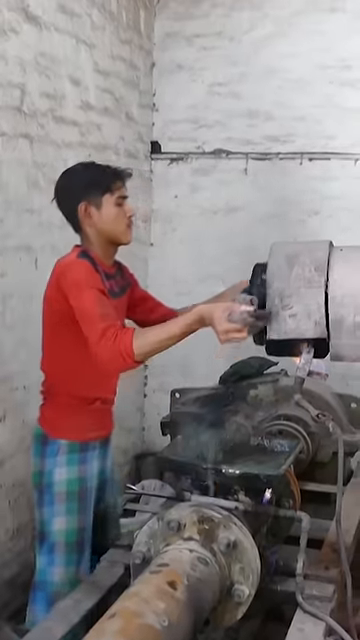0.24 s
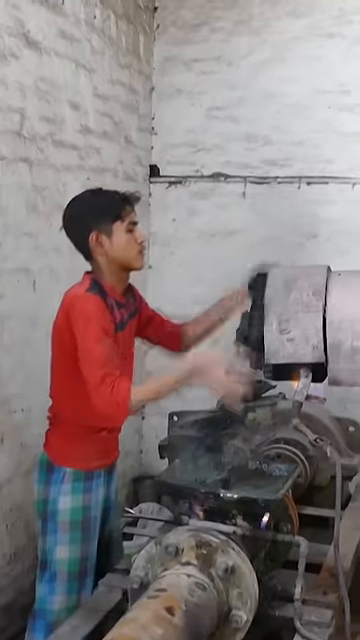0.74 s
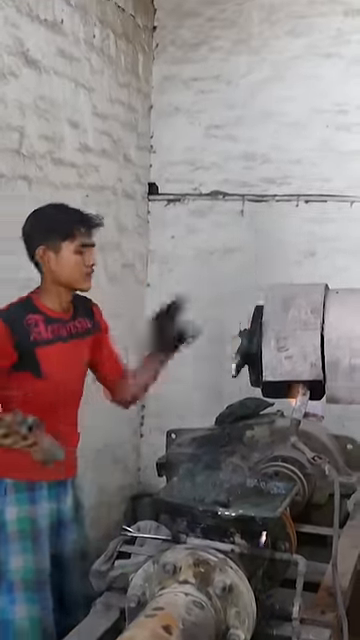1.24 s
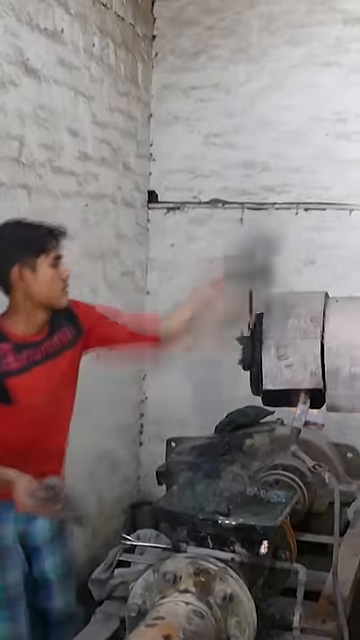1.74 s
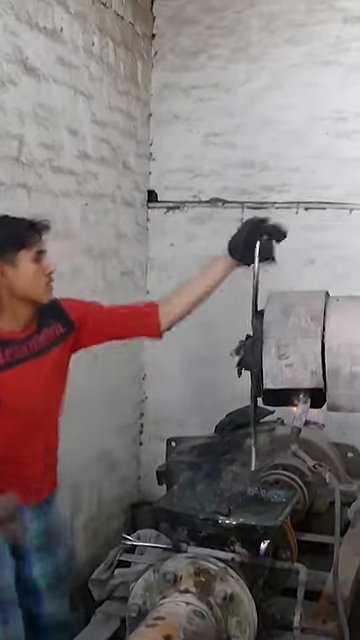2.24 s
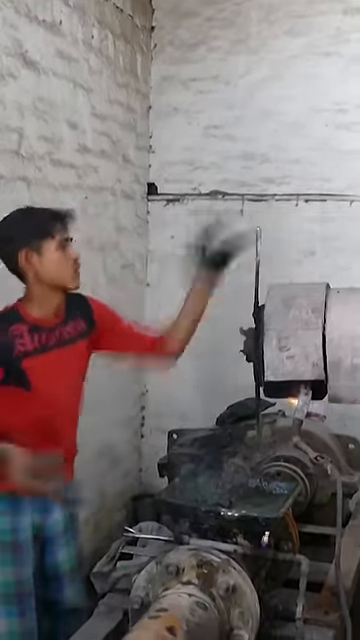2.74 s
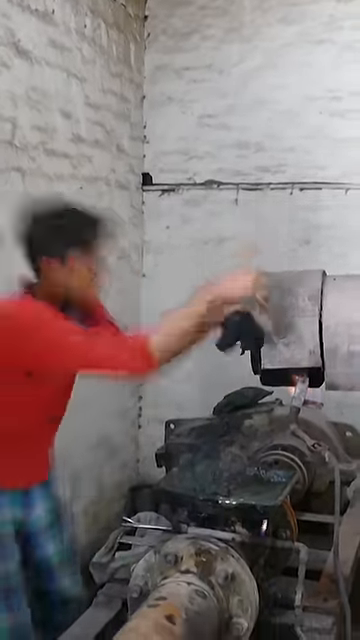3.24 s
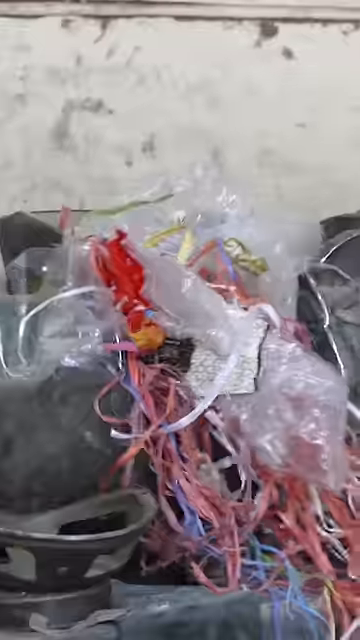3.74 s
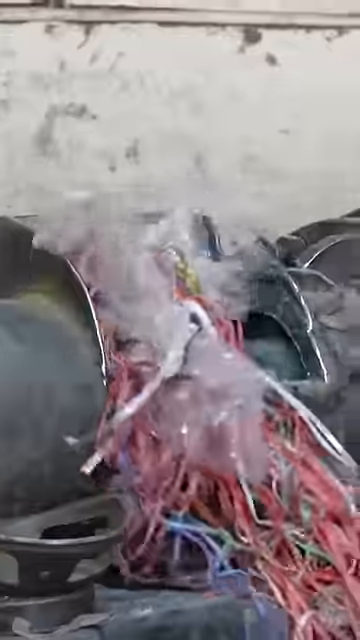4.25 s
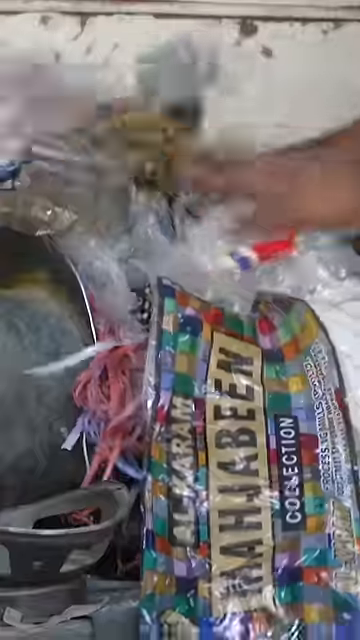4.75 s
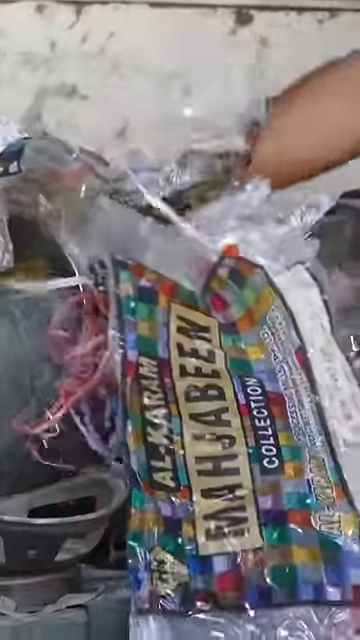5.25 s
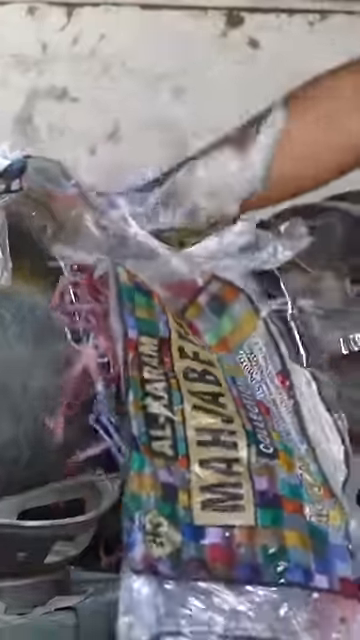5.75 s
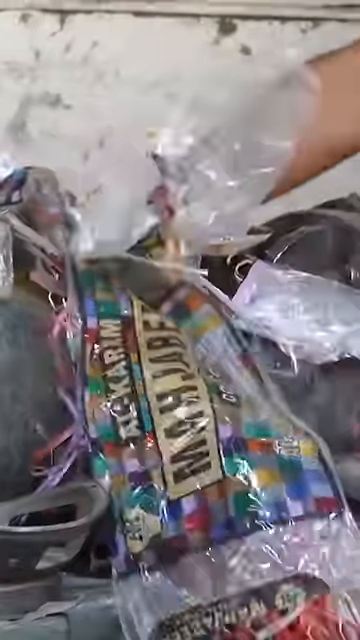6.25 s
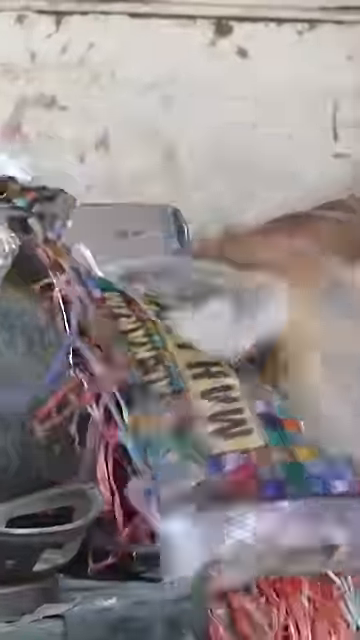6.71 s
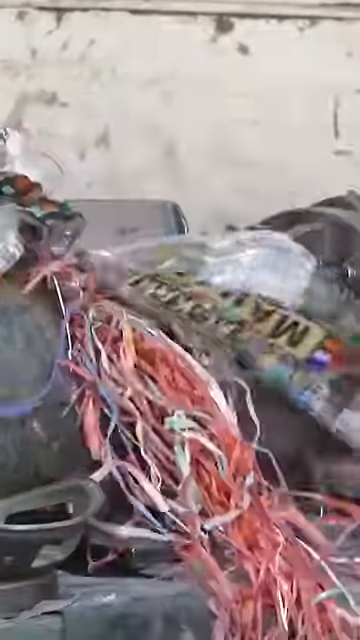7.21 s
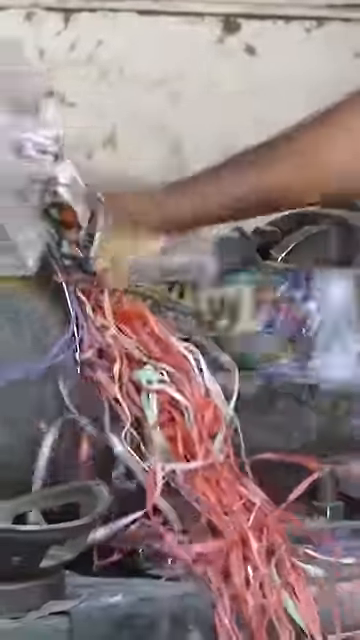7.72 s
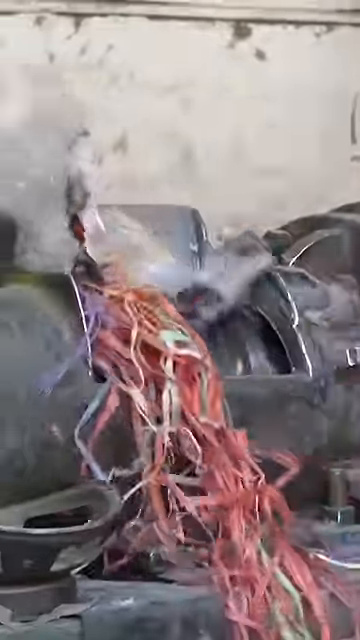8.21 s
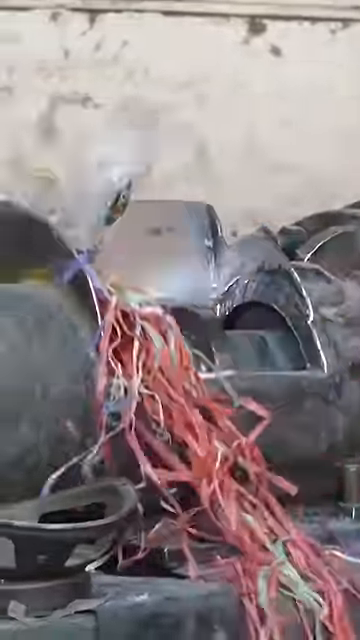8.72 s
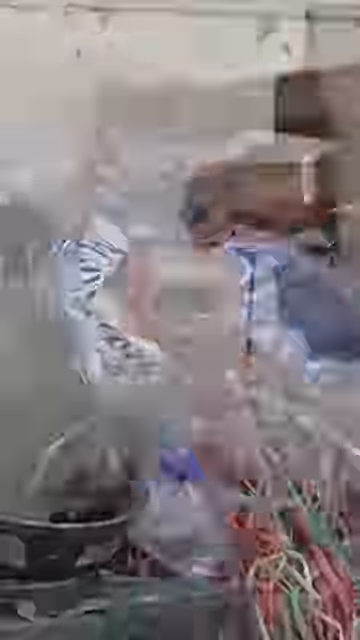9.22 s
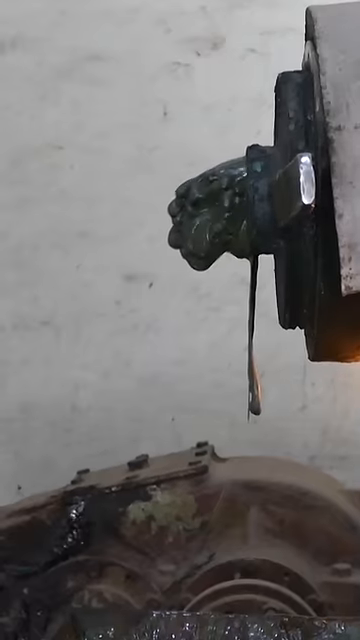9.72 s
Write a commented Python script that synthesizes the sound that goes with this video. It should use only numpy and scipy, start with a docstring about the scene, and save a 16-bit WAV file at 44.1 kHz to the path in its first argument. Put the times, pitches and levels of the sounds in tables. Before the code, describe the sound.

A plastic extruder runs close by in a small workshop, its gears whining steadily over a churning hiss. A quick double clack rings on iron at the start, followed by several short, high spits of steam and a sharp snap. The sound shifts abruptly to a wavering, pulsing drone with a faint sheet metal rattle and occasional crunches of plastic. Near the end the tone shifts again, with more crunches.

```python
"""A small brick workshop, one stereo microphone close to a plastic recycling extruder in three places
in turn: die head, feed hopper, nozzle. Gear teeth whine over the churn of bearings, fan and melt.
At the die a lump of plastic clacks on the iron head and the hot melt spits steam. At hopper and nozzle
a belt-driven rotor wavers and swells with each turn of the feed, scrap rings the hopper's sheet metal
and the screw crunches plastic."""
import sys
import numpy as np
from scipy.fft import rfft, irfft, next_fast_len
from scipy.io import wavfile
from scipy.ndimage import uniform_filter1d, map_coordinates

SR = 44100
rng = np.random.default_rng(int(sys.argv[2]) if len(sys.argv) > 2 else 0)


def unload_audio(sound):
    """Save the sound as a 16-bit wav file, at the path given as the first command line argument."""
    columns = np.transpose(np.atleast_2d(sound))
    # keep every value between -1 and 1, then stretch to whole-number steps
    steps = np.round(np.clip(columns, -1, 1) * 32767)
    wavfile.write(sys.argv[1], SR, steps.astype(np.int16))


N = 439677
T = np.arange(N) / SR
MOVES_S = [3.735, 9.292]  # the microphone goes to the hopper, then to the nozzle
MESH_HZ = [112.0, 111.92, 112.15]  # tooth rate at die, hopper, nozzle with an empty screw


# Main gear partials: mesh multiple, level/dB at die, hopper, nozzle, gain/dB when full, under strain
MAIN_PARTIALS = [(4, -31.5, -33.5, -34.5, 3, -0.5), (8, -20.5, -25, -30, -2, -1.5),
                 (12, -31.5, -31, -28.5, 1, 4)]
# Weaker gear partials: mesh multiple, relative level/dB at die, hopper, nozzle
WEAK_PARTIALS = [(1, -68.5, -92, -88), (2, -58.5, -61, -64.5), (3, -45.5, -48, -64), (5, -45, -51, -36.5),
                 (6, -45, -63, -55), (7, -46, -63, -42), (9, -50, -44, -34), (10, -66, -46, -46),
                 (11, -57, -67, -53), (13, -48, -51, -48), (16, -44.5, -43, -37), (20, -43, -40, -36.5),
                 (23, -54, -85, -51), (24, -43, -47, -54), (27, -43.5, -56, -53), (28, -46, -85, -60)]

def gearbox():
    """Tooth contacts give a stack of partials; the 4th, 8th and 12th carry the whine."""
    mesh = phase_of(mesh_rate())
    fourth_db, eighth_db, twelfth_db = [by_place(levels) + full_db * fill() + strain_db * strain()
                                        for _, *levels, full_db, strain_db in MAIN_PARTIALS]
    fourth, eighth, twelfth = [row[0] * mesh + 2 * np.pi * rng.random() for row in MAIN_PARTIALS]
    swell_db = 2.5 * np.exp(-((T - 2.13) / .64) ** 2)  # once, at the die
    out = amp(fourth_db + swell_db + .5 * wobble(2.92) + .64 * wobble(17)) * np.sin(fourth)
    fade_db = -.3 * (T - MOVES_S[0] / 2) * by_place([1, 0, 0])
    out += amp(eighth_db + fade_db + .35 * wobble(3.15) + .46 * wobble(14)) * np.sin(eighth)
    # a motor tone just above the 12th beats with it, most deeply at the die
    neighbour = by_place([.6, .1, .05]) * np.sin(twelfth + cycle(hz=5.44, peak_s=.068))
    out += amp(twelfth_db + by_place([.7, 1.8, .8]) * wobble(12)) * (np.sin(twelfth) + neighbour)
    for multiple, *levels in WEAK_PARTIALS:
        level = amp(by_place(levels) - 1 + 2.14 * wobble(9))
        out += level * np.sin(multiple * mesh + .5 * wobble(7) + 2 * np.pi * rng.random())
    return np.sqrt(2) * out


# Rotor partials: multiple of the rotor tone, level/dB at hopper, nozzle, gain/dB with a full screw
ROTOR_PARTIALS = [(1, -30, -42, 0.5), (2, -31, -31.5, 0), (3, -37, -52, -2.5), (4, -30.5, -35.5, -4.5)]

def rotor():
    """The belt tugs the rotor's speed once a lap; its low partials swell with each turn of the feed."""
    full, lap = fill(), belt()
    feed = np.cos(cycle(hz=2.283, peak_s=7.17))  # load on the feed screw
    rotor_hz = 477.5 + 4 * full
    waver = .0057 * np.cos(lap - 1.3) + (.0027 + .0038 * full) * feed + .00195 * wobble(22)
    angle = phase_of(rotor_hz * (1 + waver))
    arch = np.sqrt(np.abs(1 + feed) / 2)  # broad tops, narrow dips
    flap_db = 2 * np.cos(lap - 1.7) + 2 * np.cos(2 * lap - 2.4)  # the belt flaps on both pulleys
    swells_db = [14 * (arch - .8),
                 (2.5 + 7.5 * full) * (arch - .7) + flap_db,
                 2.9 * np.cos(lap + 1),
                 9 * (np.cos(lap + .31) - 1)]  # the 4th partial chirps once a lap
    out = np.zeros(N)
    for (multiple, hopper_db, nozzle_db, full_db), swell_db in zip(ROTOR_PARTIALS, swells_db):
        rough_db = 2.04 * np.sqrt(multiple) * wobble(50)
        level = by_place([0, amp(hopper_db), amp(nozzle_db)]) * amp(full_db * full + swell_db + rough_db)
        out -= level * np.cos(multiple * (angle + .13 * wobble(55)))  # in step: one pulse a cycle
    return np.sqrt(2) * out


# Machine noise at each microphone place: f/Hz, relative level/dB
DIE_NOISE = [(30, -95), (170, -85), (290, -70.5), (560, -64), (900, -62), (1400, -61.5), (2000, -66.5),
             (3400, -62.5), (4450, -67), (5600, -84.5), (7300, -81.5), (8200, -76), (10400, -74.5),
             (12400, -84), (15800, -82)]
HOPPER_NOISE = [(30, -93), (170, -93), (300, -73.5), (430, -63.5), (590, -55.5), (980, -54.5), (1150, -59),
                (1500, -57), (2100, -62.5), (3200, -62.5), (4300, -71), (5400, -74), (7000, -71.5),
                (9500, -75.5), (11500, -81), (15800, -85)]
NOZZLE_NOISE = [(30, -90), (160, -91), (300, -73), (450, -57), (600, -56), (820, -57.5), (950, -51.5),
                (1050, -49.5), (1170, -62.5), (1500, -56), (1900, -63.5), (2400, -60.5), (3500, -65.5),
                (4400, -72), (9500, -76.5), (15800, -87.5)]
# Its stereo width there: f/Hz, side minus mid/dB
DIE_WIDTH = [(60, -10), (120, -10), (240, -13), (480, -25), (950, -21), (1900, -14.5), (3000, -18),
             (4400, -7), (6500, -12), (15000, -10)]
HOPPER_WIDTH = [(60, -11), (120, -10), (240, -8), (480, -37.5), (950, -48.5), (1900, -18), (3800, -13.5),
                (7500, -13.5), (11000, -15.5), (15000, -34)]
NOZZLE_WIDTH = [(60, -12), (240, -12), (480, -32), (950, -30), (1900, -17), (3800, -15), (10000, -12),
                (15000, -25)]

def churn():
    """Bearings, fan and melt make a wide noise that pulses with the teeth and follows the load."""
    places = (DIE_NOISE, DIE_WIDTH), (HOPPER_NOISE, HOPPER_WIDTH), (NOZZLE_NOISE, NOZZLE_WIDTH)
    noise = sum(by_place(here) * casing(rush(*place)) for here, place in zip(np.eye(3), places))
    body = filtered(noise, lambda hz: 1 / (1 + (hz / 2200) ** 6))
    hiss = unit(noise - body)
    teeth = np.cos(phase_of(mesh_rate()))
    shaft = np.cos(cycle(hz=26.6, peak_s=0))  # the pulley shaft rattles once a turn
    near_feed = by_place([0, 1, 1])
    body_db = -1 + 1.34 * wobble(25) + .27 * teeth + near_feed * (.5 * np.cos(belt()) + 1.5 * shaft)
    hiss_db = by_place([-28, -30.5, -29]) + 1.5 * strain()
    hiss_db += .59 * wobble(40) + .33 * wobble(6) + .1 * teeth + .24 * shaft
    hiss_db -= .56 * near_feed * np.cos(cycle(hz=2.34, peak_s=7.22))
    return body * amp(body_db) + hiss * amp(hiss_db)


def casing(x, ripple_db=2.4, spacing_hz=18):
    """Crowded resonances of the iron frame and the room ripple the spectrum."""
    knots = rng.standard_normal(4096)
    ripple = lambda hz: map_coordinates(knots, [hz / spacing_hz], order=1, mode="wrap")
    return filtered(x, lambda hz: amp(ripple_db * ripple(hz) / (1 + (hz / 6000) ** 2)))


# Knocks on the die head, close by: t/s, relative level/dB
KNOCKS = [(.286, -19), (.313, -19.5)]
# Modes of the iron head: f/Hz, relative level/dB, t60/s
IRON_MODES = [(656.6, -6, 0.45), (1140, -8, .12), (1720, -4, .12), (2050, -5, .15), (2568, -9, .12),
              (3120, -1, 0.14), (3630, 0, 0.079), (3770, -3, 0.17)]
# Cracking plastic: f/Hz, relative level/dB
PLASTIC_SPECTRUM = [(400, -22), (650, 7), (900, 3), (1500, 10), (3300, 6), (4500, -23), (10000, -30)]

def clacks():
    """A lump of plastic hits the head with a short crack and rings the iron, each time differently."""
    iron = np.zeros(N)
    age = T[:SR // 2]
    for s, db in KNOCKS:
        ring = np.zeros(len(age))
        for hz, mode_db, t60 in IRON_MODES:
            level = amp(mode_db + rng.normal(0, 2) - 60 * age / t60)
            ring += level * np.sin(2 * np.pi * (hz * age + rng.random()))
        iron[round(s * SR):][:len(age)] += amp(db - 5) * ring * (1 - np.exp(-age / .001))
    crack = bursts(KNOCKS, PLASTIC_SPECTRUM, rise_s=.001, t60=.04, tail_db=-21, tail_t60=.2)
    return iron + amp(-1) * crack


# Spits close to the die: t/s, level/dB
STEAM_SPITS = [(2.205, -42), (2.603, -24), (2.842, -32), (3.001, -25), (3.363, -28), (3.612, -34)]
# Their hiss: f/Hz, relative level/dB
STEAM_SPECTRUM = [(4000, -40), (6500, -14), (7500, -7), (8700, 5), (9300, -7), (12300, -14), (13200, -2),
                  (14000, -9), (14900, -4), (16000, -12)]

def steam():
    """The hot melt spits steam in short, high puffs."""
    return bursts(STEAM_SPITS, STEAM_SPECTRUM, rise_s=.0033, t60=.063, tail_db=-7.5, tail_t60=.41)


SNAP_S = 3.084
# The snap's colour: f/Hz, relative level/dB
SNAP_SPECTRUM = [(5000, -30), (8000, -4), (10300, 4), (12000, -8), (15500, -11)]

def snap():
    """One sharp, bright snap at the die."""
    envelope = np.exp(-((T - SNAP_S - .001) / .0011) ** 2)
    return amp(-19.5) * envelope * unit(rush(SNAP_SPECTRUM, BURST_WIDTH))


# Plastic in the screw, heard from hopper and nozzle: t/s, level/dB
SCREW_BITES = [(3.765, -22), (3.805, -26), (8.68, -26.5), (8.83, -22), (9.395, -24), (9.454, -30),
               (9.75, -25)]

def crunches():
    """Plastic caught by the screw breaks in crackling bursts."""
    crackle = amp(3.5 * wobble(120))
    return crackle * bursts(SCREW_BITES, PLASTIC_SPECTRUM, rise_s=.0074, t60=.15,
                            tail_db=-14, tail_t60=.19)


# Sheet metal modes: f/Hz, bandwidth/Hz, level/dB at the hopper
SHEET_MODES = [(590.5, 39, -37.5), (670.6, 25, -39.5), (780, 28, -43)]

def chute(knocks_per_s=90):
    """Scrap knocks at random on the hopper's sheet metal, which rings in a few low modes."""
    knocks = (rng.random(N) < knocks_per_s / SR) * rng.standard_normal(N)
    out = np.zeros(N)
    for hz, width, db in SHEET_MODES:
        resonance = lambda f: (1j * f * width / (hz * hz - f * f + 1j * f * width)) ** 2
        out += amp(db) * unit(filtered(knocks, resonance))
    return by_place([0, 1, .8]) * out


# Motor and bearing tones: f/Hz at the opening speed, level/dB at die, hopper, nozzle
MOTOR_TONES = [(549, -49, -50, -56), (1464, -43, -52, -43), (2304, -41, -52, -43), (3290, -52, -46, -55),
               (3402, -48, -51, -47), (3725, -47, -62, -52), (3838, -43, -44, -53), (4497, -54, -68, -66),
               (4834, -67, -56, -58)]

def motor():
    """Motor and bearings sing faintly behind the gears and follow their speed."""
    mesh_hz = mesh_rate()
    out = np.zeros(N)
    for hz, *levels in MOTOR_TONES:
        level = amp(by_place(levels) + 1.8 * wobble(9))
        out += level * np.sin(phase_of(hz * mesh_hz / mesh_hz[0]) + .5 * wobble(13))
    return np.sqrt(2) * out


# Wads jamming in the screw: t/s, length/s
JAMS = [(3.74, 0.31), (9.276, 0.073)]

def strain(rise_s=.037, release_s=.38):
    """Effort of the screw, 0-1: it rises fast on a wad, holds and lets go."""
    return sum(np.clip(1 + (T - s) / rise_s, 0, 1) * np.exp(-np.maximum(T - s - length, 0) / release_s)
               for s, length in JAMS)


def fill(start_s=4.3, length_s=3.3):
    """How full the screw is, 0-1, at the hopper only: it grows as scrap is fed in."""
    return np.clip((T - start_s) / length_s, 0, 1) * by_place([0, 1, 0])


def mesh_rate(sag_hz=.3):
    """Teeth per second: steady, sagging a little as the screw fills."""
    return by_place(MESH_HZ) - sag_hz * fill()


def belt():
    """Angle of the drive belt on its way round."""
    return cycle(hz=5.925, peak_s=6.5)


# Stereo width of short sounds at the microphone: f/Hz, side minus mid/dB
BURST_WIDTH = [(60, -11), (150, -14), (400, -26), (1000, -25), (2400, -16), (5000, -10), (14000, -13)]

def bursts(events, spectrum, rise_s, t60, tail_db, tail_t60):
    """Short puffs of noise, each with a weaker tail from the room."""
    level = np.zeros(N)
    for s, db in events:
        age = np.maximum(T - s, 0)
        decay = amp(-60 * age / t60) + amp(tail_db - 60 * age / tail_t60)
        level += amp(db) * (1 - np.exp(-age / rise_s)) * decay
    return level * unit(rush(spectrum, BURST_WIDTH))


def rush(spectrum, width):
    """Stereo noise with the given level per Hz and side share."""
    white = rng.standard_normal((2, N)) * np.sqrt(SR / 2)
    mid, side = filtered(white, lambda hz: gain_at(spectrum, hz) * [np.ones_like(hz), gain_at(width, hz)])
    return np.array([mid + side, mid - side])


def by_place(values):
    """The value for where the microphone stands: die, hopper, nozzle."""
    return uniform_filter1d(np.asarray(values, float)[np.searchsorted(MOVES_S, T)], size=128)


def amp(db):
    """Decibels to gain."""
    return 10 ** (np.asarray(db) / 20)


def unit(x):
    """Scaled to rms 1."""
    return x / np.sqrt(np.mean(x ** 2) + 1e-20)


def gain_at(points, hz):
    """Gain between (f/Hz, level/dB) points on a log axis."""
    f, db = np.transpose(points)
    return amp(np.interp(np.log(hz + 1), np.log(f + 1), db))


def wobble(rate):
    """A smooth random curve, rate knots a second."""
    coarse = T[::32]
    curve = map_coordinates(rng.standard_normal(4096), [coarse * rate], mode="wrap")
    return np.interp(T, coarse, curve)


def filtered(x, response):
    """x times a response of frequency."""
    size = next_fast_len(N + SR // 4)
    return irfft(rfft(x, size) * response(np.fft.rfftfreq(size, 1 / SR)), size)[..., :N]


def phase_of(hz):
    """Running angle of a frequency curve."""
    return 2 * np.pi * (np.cumsum(hz) / SR + rng.random())


def cycle(hz, peak_s):
    """Angle of a steady cycle, zero at peak_s."""
    return 2 * np.pi * hz * (T - peak_s)


# The treble leans left at the microphone: f/Hz, level/dB added left and taken off right
LEAN = [(1200, 0), (2500, .55), (5000, .6), (11000, .25)]

def scene():
    """The whole machine from the three places; its level dips briefly after the snap."""
    mix = gearbox() + motor() + rotor() + chute() + churn() + crunches() + steam() + snap() + clacks()
    dip_db = -2.8 * np.exp(-((T - SNAP_S - .018) / .02) ** 2)
    return filtered(mix * amp(dip_db), lambda hz: gain_at(LEAN, hz) ** np.array([[1], [-1]]))


def record(dry, top_hz=15880):
    """The recorder keeps nothing above its band limit."""
    return filtered(dry, lambda hz: hz < top_hz)


dry = scene()
out = record(dry)
unload_audio(out)
```